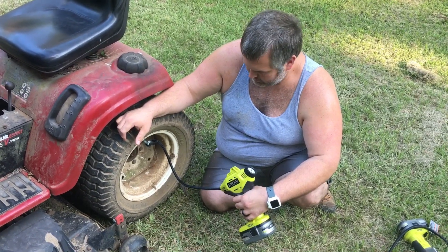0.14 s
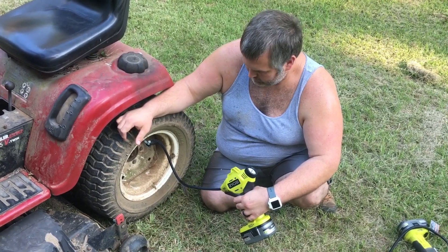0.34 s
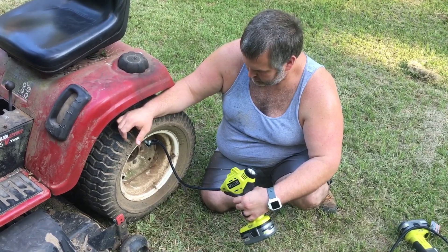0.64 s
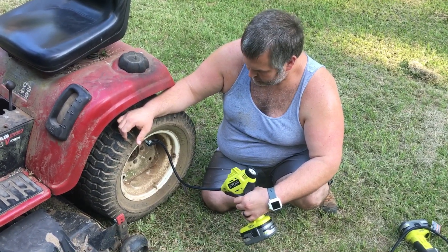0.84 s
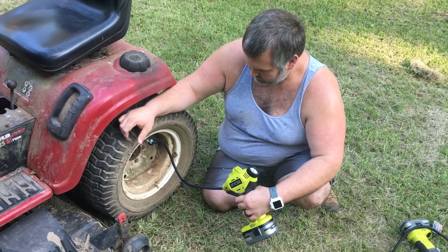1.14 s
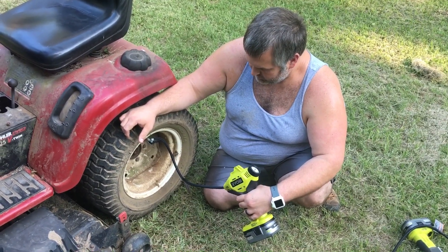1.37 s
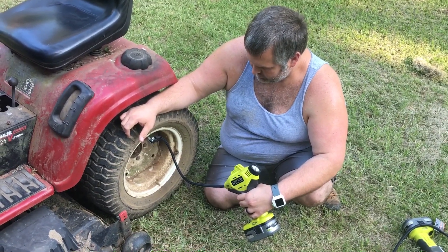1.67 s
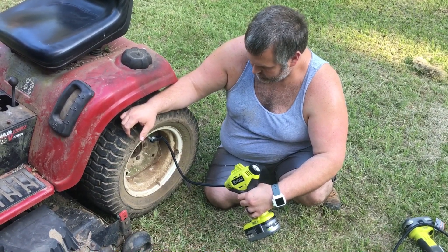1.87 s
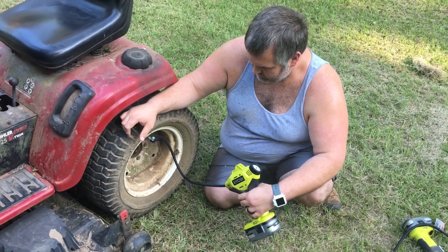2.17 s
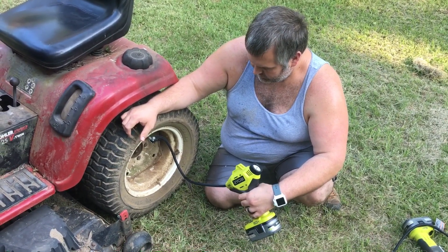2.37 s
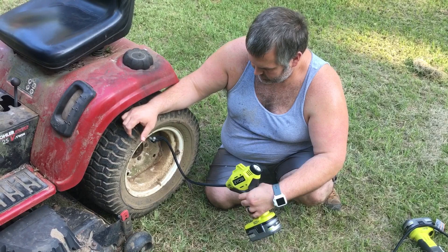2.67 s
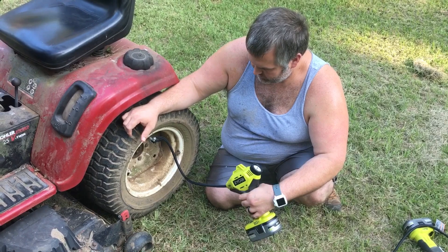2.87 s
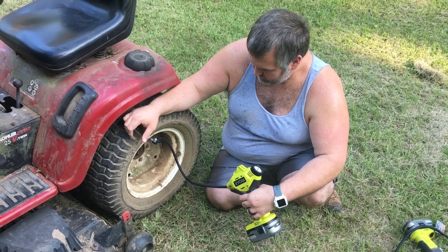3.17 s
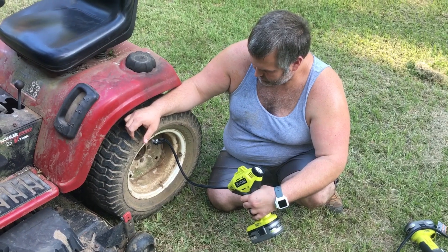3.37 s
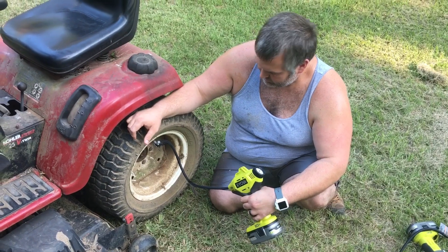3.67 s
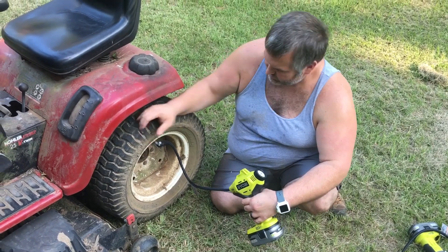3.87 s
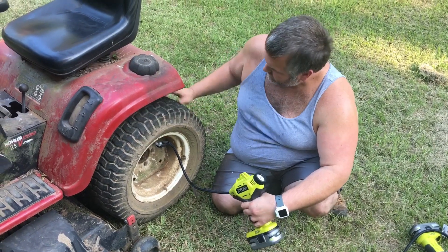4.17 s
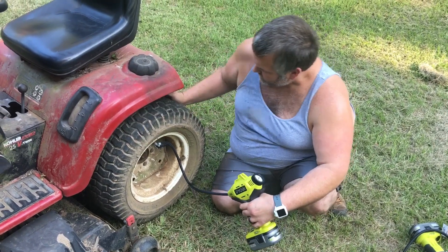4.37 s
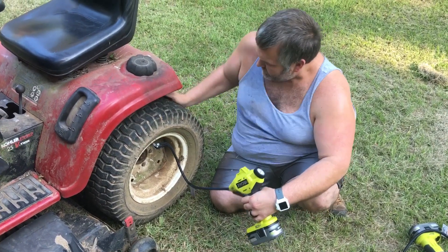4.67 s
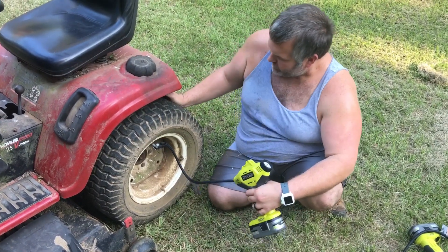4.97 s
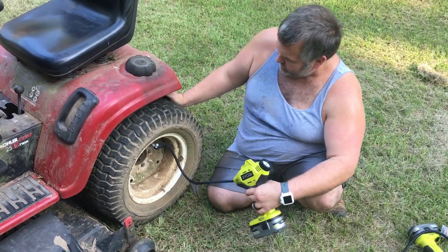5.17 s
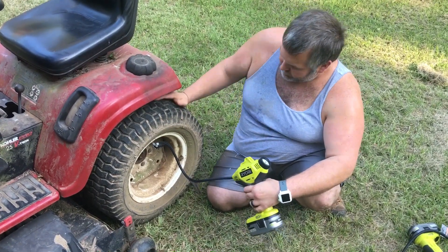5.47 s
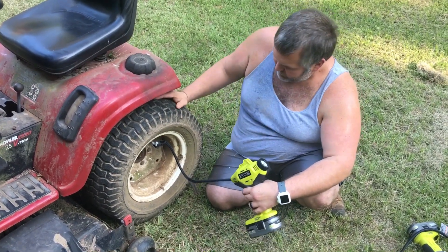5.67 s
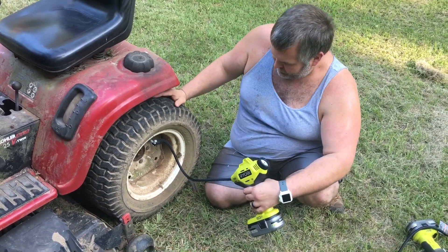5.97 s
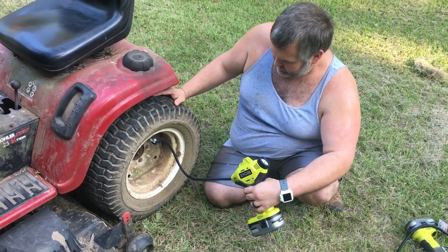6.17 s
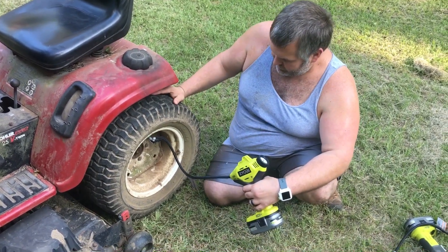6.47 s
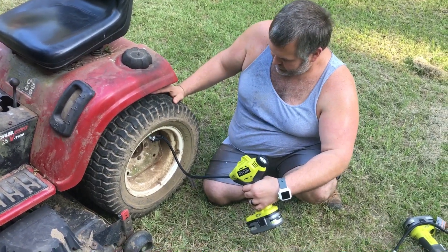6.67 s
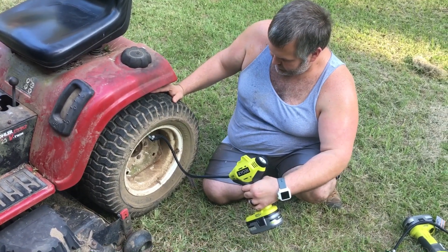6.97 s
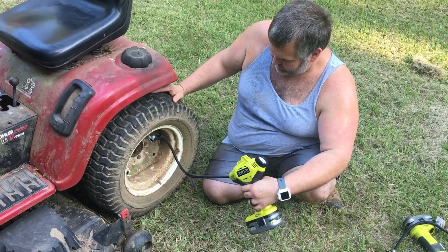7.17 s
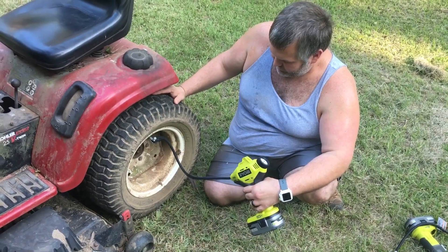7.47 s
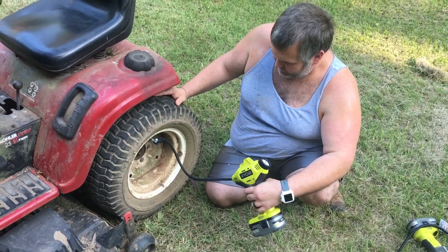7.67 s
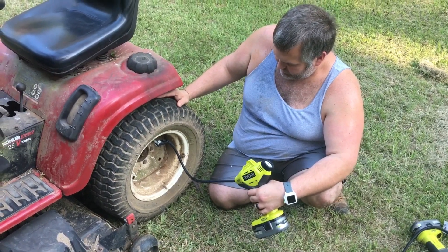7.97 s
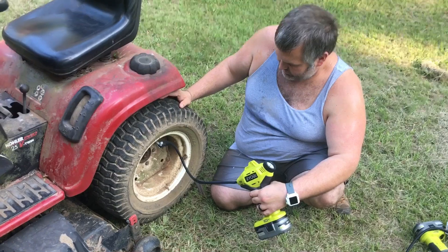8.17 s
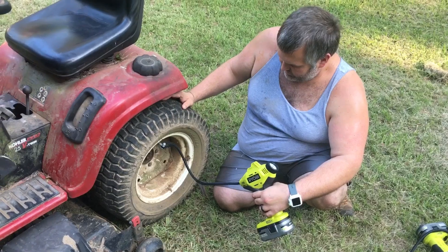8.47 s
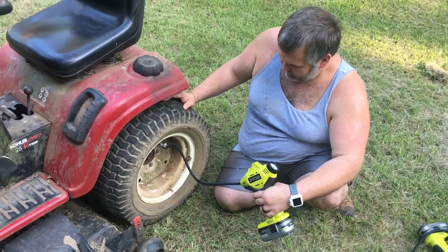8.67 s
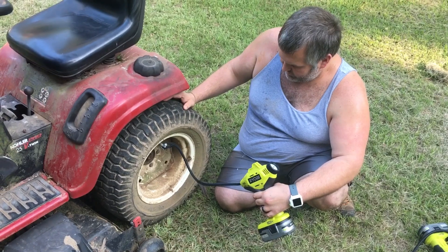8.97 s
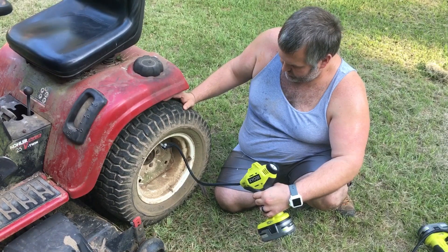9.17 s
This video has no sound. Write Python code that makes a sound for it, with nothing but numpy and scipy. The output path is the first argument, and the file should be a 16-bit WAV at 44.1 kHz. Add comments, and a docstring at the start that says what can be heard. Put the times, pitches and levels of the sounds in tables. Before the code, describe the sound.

Outdoors and close to the microphone, a handheld electric tire inflator buzzes steadily while filling a riding mower's tire. The sound is fast, raspy and mechanical, with a low hum beneath and a fine airy hiss on top. Its tone color changes slightly midway, then the motor slows just a touch and gets a little louder. A faint rumble and occasional dull bumps lie underneath.

```python
"""Outdoors, a cordless inflator held beside the wheel pumps up a lawn mower tyre.
A small motor geared down to a crank drives one piston, 66 strokes a second: each stroke knocks, the
drive rattles, the valves tick and hiss, and the gear whine sags under compression. As the tyre fills,
the crank slows a little and the pump grows louder. Halfway the holder reaches over the tyre and shifts,
which changes the echoes and resonances. A faint rumble and a few soft bumps lie underneath."""
import sys
import numpy as np
from scipy import signal
from scipy.fft import rfft, irfft
from scipy.io import wavfile
from scipy.ndimage import uniform_filter1d

SR = 44100
rng = np.random.default_rng(int(sys.argv[2]) if len(sys.argv) > 2 else 0)


def unload_wav(signal):
    """Save mono or channel-first audio to the path in sys.argv[1] as 16-bit WAV at rate SR, clipped to [-1, 1]."""
    wavfile.write(
        sys.argv[1],
        SR,
        np.round(np.clip(np.atleast_2d(signal).T, -1, 1) * 32767).astype(np.int16),
    )


N = 411453
TIME = np.arange(N) / SR
CRANK_TEETH, PINION_TEETH = 46, 10


def undb(db):
    """Decibels to amplitude ratio."""
    return 10 ** (np.asarray(db) / 20)


def walk(rate_hz):
    """Smoothed random steps, with a spread near 1."""
    hold = max(int(SR / rate_hz), 1)
    steps = np.repeat(rng.standard_normal(N // hold + 1), hold)
    return 1.31 * uniform_filter1d(uniform_filter1d(steps, hold), hold)[:N]


def shape(x, gain_db, size=8192):
    """Minimum-phase filter whose gain in dB is a function of frequency."""
    hz = np.maximum(np.fft.rfftfreq(size, 1 / SR), 1)
    cepstrum = irfft(np.log(undb(gain_db(hz))))
    cepstrum[1:size // 2] *= 2
    cepstrum[size // 2 + 1:] = 0
    return signal.oaconvolve(x, irfft(np.exp(rfft(cepstrum))))[:N]


def colour(x, spectrum):
    """Filtering by a spectral envelope drawn through (Hz, dB) points."""
    hz, db = np.transpose(spectrum)
    return shape(x, lambda f: np.interp(np.log(f), np.log(hz), db))


def ring(x, modes):
    """Resonances and antiresonances: Lorentzian peaks and notches in dB."""
    return shape(x, lambda f: sum(db / (1 + (2 * (f - hz) / width) ** 2) for hz, width, db in modes))


def surges(turn, rows):
    """Periodic modulation in dB: Gaussian surges that recur on every turn."""
    return sum(db * np.exp(-(((turn - centre + .5) % 1 - .5) / width) ** 2) for centre, width, db in rows)


def move(at_s, duration_s=.35):
    """A change of pose: a linear ramp from 0 to 1, centred on a moment."""
    return np.clip((TIME - at_s) / duration_s + .5, 0, 1)


def crank_hz(steady_hz=66.075, back_pressure_s=5.6, sag_hz_per_s=.1):
    """Loading: the crank runs steadily until the tyre pushes back, then slows evenly."""
    return steady_hz - sag_hz_per_s * np.maximum(TIME - back_pressure_s, 0)


def rumble():
    """Ambient noise: steady, faint and strongest in the bass."""
    # Each row: frequency in Hz, level in dB.
    spectrum = [(20, -62), (35, -40), (55, -24), (80, -33), (120, -39.5), (250, -43.5), (1000, -48.5),
                (15000, -75)]
    return colour(rng.standard_normal(N), spectrum)


def bumps(decay_s=.015, gain_db=22):
    """Exponentially damped bursts of low noise, heard as dull thuds."""
    # Each row: start in seconds, relative level in dB.
    thuds = [(1.858, -29), (2.629, -35), (5.689, -37), (6.619, -31), (7.26, -35), (7.359, -34),
             (8.249, -34)]
    # Each row: frequency in Hz, gain in dB.
    spectrum = [(20, -22), (50, -5), (80, -2), (150, -18), (400, -15), (900, -38), (4000, -76)]
    envelope = sum(undb(db + gain_db) * (TIME > s) * np.exp(-np.abs(TIME - s) / decay_s)
                   for s, db in thuds)
    return colour(envelope * rng.standard_normal(N), spectrum)


def hum(turn, rotor_db=-59, waver_db=.28, jolt_turn=.0923, hand_lifts_s=4.3):
    """Forced vibration: the piston shakes the body at crank harmonics; the rotor adds its own line."""
    # Each row: harmonic number, level in dB before and after the hand leaves the valve.
    harmonics = [(1, -45.5, -45), (2, -45.5, -45.5), (3, -54.5, -55.5), (5, -82, -89), (6, -46.5, -51.5),
                 (7, -64, -59), (8, -72.5, -61), (10, -70, -60), (11, -51.5, -52)]
    lifted = move(hand_lifts_s)
    body = sum(undb(before + lifted * (after - before)) * np.sin(2 * np.pi * round(k) * (turn - jolt_turn))
               for k, before, after in harmonics)
    rotor = undb(rotor_db) * np.sin(2 * np.pi * turn * CRANK_TEETH / PINION_TEETH)
    return np.sqrt(2) * (body + rotor) * undb(waver_db * walk(11))


def surroundings(works, shift, reflect_above_hz=2200, chest_db=-11.5, blocked_db=-12):
    """Resonance and reflection round the wheel; long waves diffract past the holder, treble echoes."""
    # Modes of the housing and the space round the wheel, before and after the holder shifts.
    # Each row: frequency in Hz, width in Hz, gain in dB.
    modes_before = [(822, 36, 8), (1030, 77, 8.5), (1376, 434, 9), (1722, 128, 12.5), (2120, 130, -2.5),
                    (2583, 89, 12.5), (2730, 34, 5), (2804, 106, -11), (2997, 135, 8.5), (3106, 26, 4.5),
                    (3440, 240, 2.5), (3647, 130, 9.5), (4210, 290, 2), (4630, 520, 3), (5500, 100, -4),
                    (6070, 150, -2), (6550, 500, 4), (7100, 140, -6), (7340, 180, 5), (8830, 150, 11),
                    (9000, 290, -14), (9620, 350, 5.5)]
    modes_after = [(992, 240, 8.5), (1230, 97, 4), (1337, 61, -9.5), (1460, 212, 12), (1700, 154, 15.5),
                   (1747, 44, -17.5), (1960, 79, 6.5), (2150, 11, 19.5), (2250, 340, -5), (2740, 250, 8.5),
                   (2760, 290, -5), (3210, 90, 14.5), (3282, 155, -8.5), (3640, 190, 8.5),
                   (3990, 110, -7.5), (4140, 160, 8), (4970, 210, -6.5), (5090, 240, 8.5), (6030, 150, 7),
                   (6500, 180, 8.5), (7720, 250, 1.5), (9100, 190, 2), (9400, 220, 2), (9820, 110, 1.5)]
    # The reaching arm blocks an echo off the wheel, and the chest adds one.
    # Each row: start, end, delay of the blocked echo, delay of the chest echo, all in seconds.
    reaches = [(3.9, 4.75, .00061, .00202), (4.8, 6.05, .00065, .00274)]
    heard = (1 - shift) * ring(works, modes_before) + shift * ring(works, modes_after)
    treble = signal.sosfiltfilt(signal.butter(2, reflect_above_hz, "high", fs=SR, output="sos"), heard)
    for start, end, blocked_s, chest_s in reaches:
        chest = undb(chest_db) * np.interp(TIME - chest_s, TIME, treble)
        blocked = undb(blocked_db) * np.interp(TIME - blocked_s, TIME, treble)
        heard += (move(start) - move(end)) * (chest - blocked)
    return heard


def rush(spectrum, turn, gate_db, repeat, grain_db, grain_hz, size=668):
    """Cyclostationary noise: gated by the stroke, with a share that repeats on every turn."""
    recurring = rng.standard_normal(size)[(turn % 1 * size).astype(int)]
    fresh = rng.standard_normal(N) * undb(grain_db * walk(grain_hz))
    noise = np.sqrt(repeat) * recurring + np.sqrt(1 - repeat) * fresh
    return colour(noise * undb(gate_db), spectrum)


def knocks(turn, shift, spectrum, scatter_db, slack_s, order=8):
    """A filtered impulse train: one slightly irregular blow a turn, with its early reflections."""
    # Echoes off wheel and fender. Each row: delay in seconds before and after the shift, gain.
    bounces = [(.00163, .00178, .57), (.003, .0039, .1)]
    count = np.arange(int(turn[-1]) + 1)
    chance = rng.standard_normal((len(count), 2))
    at = np.interp(count, turn, TIME) + slack_s * chance[:, 0]
    size = undb(scatter_db * chance[:, 1]) * np.sqrt(N / len(count))
    moved = np.interp(at, TIME, shift)
    blows = np.zeros(N)
    for before, after, gain in [(0, 0, 1)] + bounces:
        place = (at + before + moved * (after - before))[:, None] * SR
        near = place.astype(int) + np.arange(1 - order, order + 1)
        impulse = np.sinc(near - place) * np.sinc((near - place) / order)  # falls between samples
        np.add.at(blows, np.clip(near, 0, N - 1), gain * size[:, None] * impulse)
    return colour(blows, spectrum)


def valve_hiss(turn, exhaust_db=-5.5, intake_db=-12):
    """Turbulent flow: air hisses through both valves as the piston pushes and draws."""
    # Each row: frequency in Hz, gain in dB.
    exhaust_spectrum = [(2000, -65.5), (4500, -38.5), (6400, -33), (7300, -36.5), (9900, -33), (10400, -53),
                        (12500, -43.5), (15500, -50)]
    intake_spectrum = [(3000, -40), (6100, -40), (7500, -62), (10500, -44), (12500, -48), (14000, -33.5),
                       (15500, -33)]
    # Each row: turns after the knock, half width in turns, lift in dB.
    exhaust_flow = [(.17, 0.15, 8.5), (.73, 0.12, 5.7)]
    intake_flow = [(.12, 0.18, 7.7), (.82, 0.23, 8.9)]
    exhaust = rush(exhaust_spectrum, turn, exhaust_db + surges(turn, exhaust_flow),
                   repeat=.38, grain_db=2.1, grain_hz=601.3)
    intake = rush(intake_spectrum, turn, intake_db + surges(turn, intake_flow),
                  repeat=.5, grain_db=1.5, grain_hz=255)
    return exhaust + intake


def reed(turn, open_turn=.85, half_width_turns=.099, pitch_hz=6070, fall_hz_per_turn=800):
    """Reed vibration: the intake valve whistles once a turn, falling in pitch as it closes."""
    since = (turn - open_turn + .5) % 1 - .5
    cycles = (pitch_hz * since - fall_hz_per_turn * since ** 2 / 2) / crank_hz()
    level_db = -36 + 2.5 * TIME / TIME[-1] + 1.5 * walk(60)  # grows as the tyre fills, and flutters
    return undb(level_db) * np.exp(-(since / half_width_turns) ** 2) * np.sin(2 * np.pi * cycles)


def valve_tick(turn, shift, lag_turns=.26):
    """Impact: the outlet valve ticks once a turn, after the knock."""
    # Each row: frequency in Hz, gain in dB.
    spectrum = [(1500, -66.5), (3400, -39.5), (4300, -32), (5200, -40), (7000, -47), (15000, -64)]
    return knocks(turn - lag_turns, shift, spectrum, scatter_db=2, slack_s=.00004)


def rattle(turn, gain_db=-.6):
    """Mechanical play: the loose drive makes grainy noise that swells slightly once a turn."""
    # Each row: frequency in Hz, gain in dB.
    spectrum = [(60, -70), (250, -43.5), (500, -42), (700, -32.5), (1000, -31), (1700, -29.5), (2300, -25),
                (3200, -24.5), (4200, -31.5), (6500, -38), (10000, -57.5)]
    # Each row: turns after the knock, half width in turns, lift in dB.
    swell = [(0.21, 0.183, 0.83)]
    return rush(spectrum, turn, gain_db + surges(turn, swell), repeat=.13, grain_db=2, grain_hz=2500)


def gears(turn, whine_db=-47, sag=.13, fastest_turn=.71, backlash_rad=.27, advance_turns_per_s=.011):
    """Frequency modulation: the tooth-mesh tone sags under compression; load makes it louder."""
    # Each row: turns after the knock, half width in turns, lift in dB.
    load = [(.25, 0.13, 17), (0.971, 0.17, 20.5)]
    angle = turn + sag * np.sin(2 * np.pi * (turn - fastest_turn)) / (2 * np.pi)
    mesh = 2 * np.pi * CRANK_TEETH * angle + backlash_rad * walk(300)
    # the slightly eccentric pinion presses harder once per motor turn
    press = 1 + .1 * np.sin(2 * np.pi * angle * CRANK_TEETH / PINION_TEETH)
    load_db = surges(turn + advance_turns_per_s * TIME, load)  # comes earlier as the tyre fills
    return undb(whine_db + load_db) * press * np.sin(mesh)


def piston(turn, shift):
    """Periodic impact: one knock a stroke fuses into a buzz of crank harmonics."""
    # Each row: frequency in Hz, gain in dB.
    spectrum = [(200, -55), (500, -66.5), (730, -34), (850, -24.5), (1000, -28), (1700, -28.5), (2400, -26),
                (3200, -39.5), (4200, -39), (6500, -45.5), (9800, -47.5), (10600, -57), (15500, -78)]
    return knocks(turn, shift, spectrum, scatter_db=-.5, slack_s=.000012)


def inflator(first_knock_turn=.21, flat_tyre_db=.83, growth_db_per_s=.0843):
    """Phase locking: every part follows the one crank, and the pump grows louder as the tyre fills."""
    # The holder's shift. Each row: time in seconds, share of the second position from 0 to 1.
    positions = [(3.8, 0.2), (4.1, 0.22), (4.7, 0.18), (5.0, 0.76), (5.8, 0.96)]
    shift = np.interp(TIME, *np.transpose(positions))
    turn = np.cumsum(crank_hz() * (1 + .0006 * walk(40))) / SR - first_knock_turn
    impacts = piston(turn, shift) + valve_tick(turn, shift)
    works = impacts + rattle(turn) + valve_hiss(turn) + gears(turn) + reed(turn)
    return surroundings(works, shift) * undb(flat_tyre_db + growth_db_per_s * TIME) + hum(turn)


def scene():
    """Superposition of rumble, inflator and bumps in one channel."""
    return (rumble() + inflator() + bumps())[None]


def record(dry, top_hz=15800):
    """Band limiting: an elliptic low-pass cuts the top steeply."""
    return signal.sosfilt(signal.ellip(10, .2, 80, top_hz, fs=SR, output="sos"), dry)


dry = scene()
out = record(dry)
unload_wav(out)
```